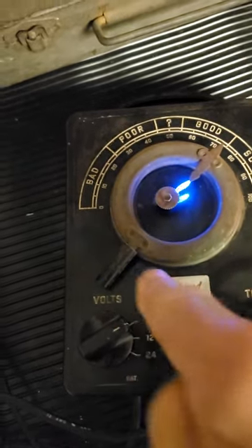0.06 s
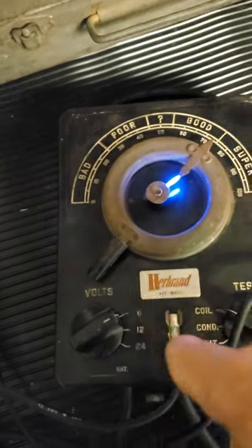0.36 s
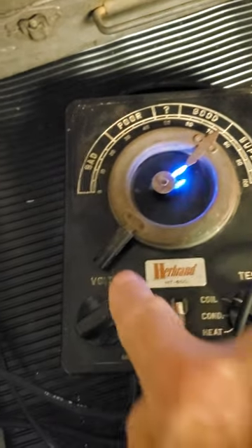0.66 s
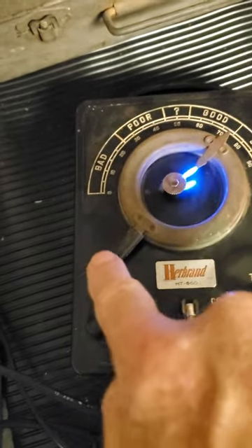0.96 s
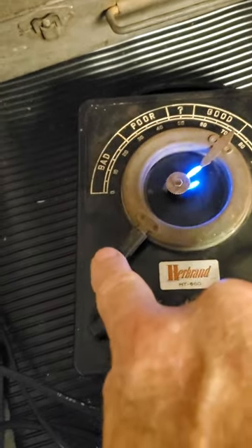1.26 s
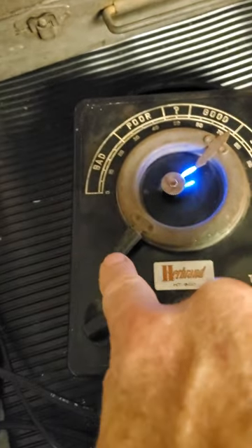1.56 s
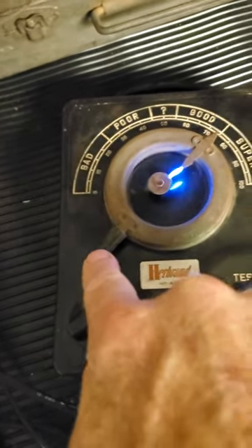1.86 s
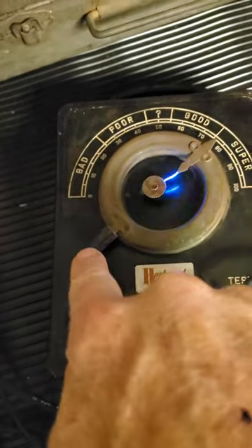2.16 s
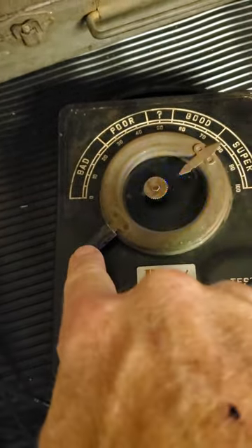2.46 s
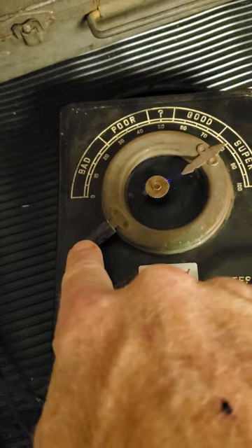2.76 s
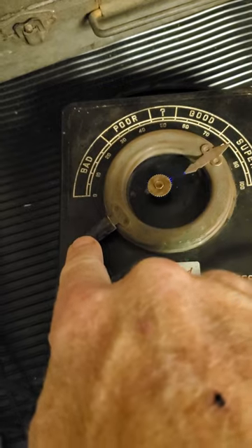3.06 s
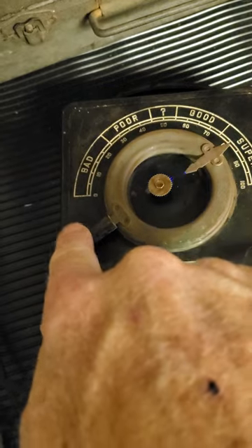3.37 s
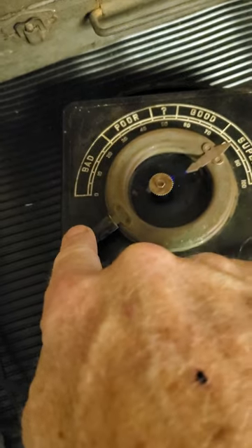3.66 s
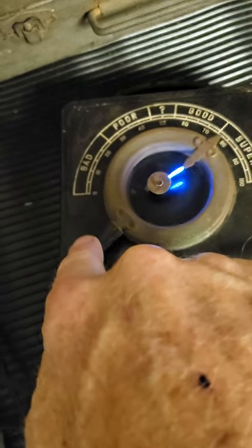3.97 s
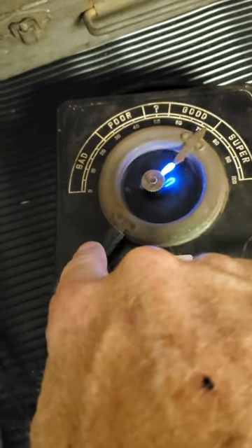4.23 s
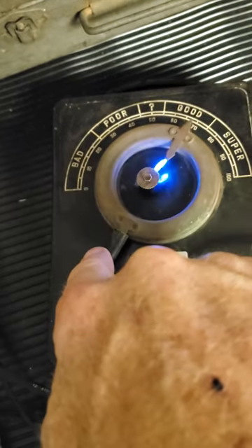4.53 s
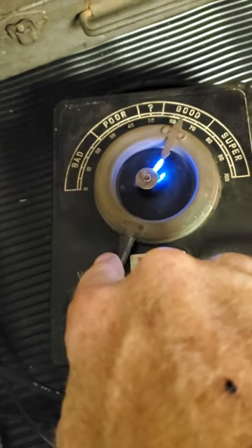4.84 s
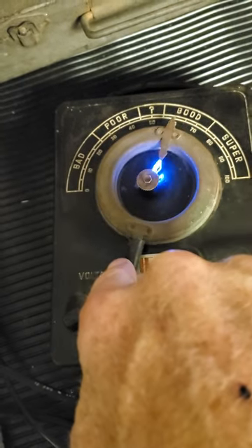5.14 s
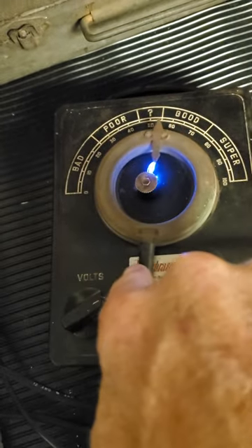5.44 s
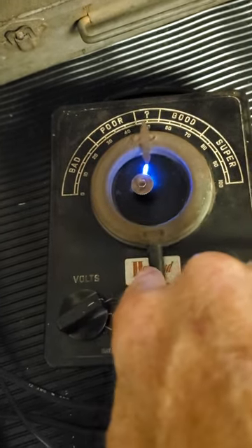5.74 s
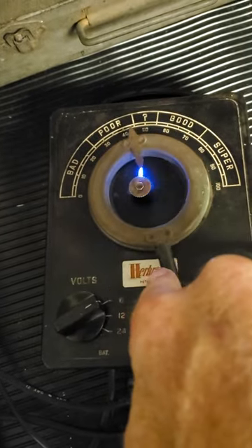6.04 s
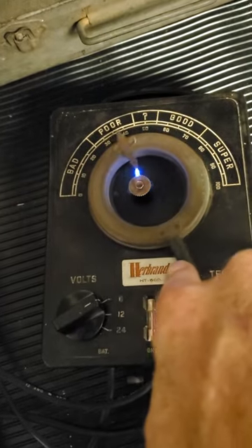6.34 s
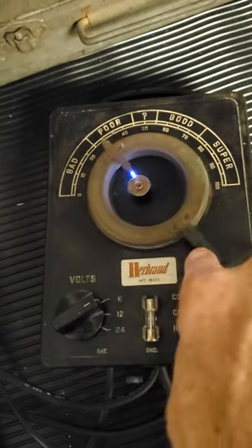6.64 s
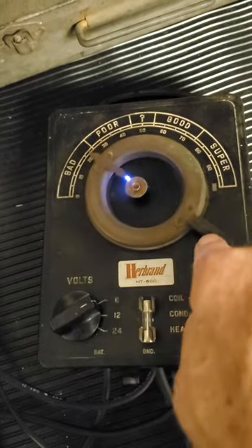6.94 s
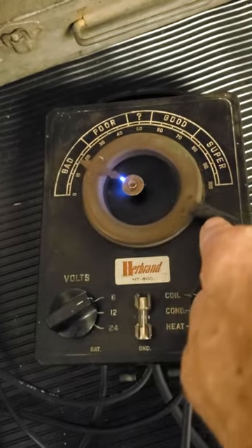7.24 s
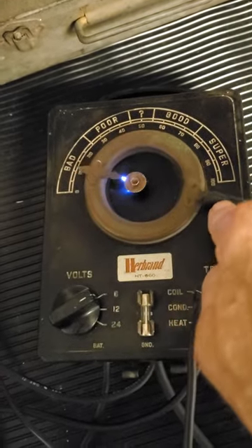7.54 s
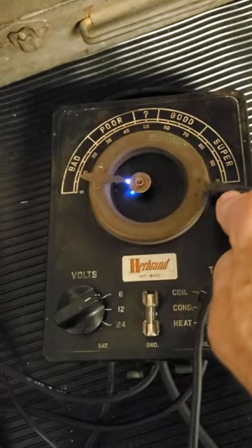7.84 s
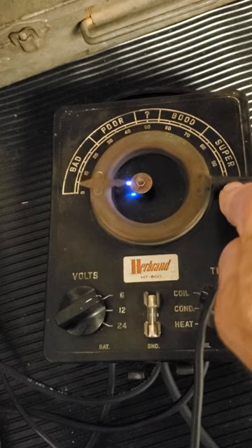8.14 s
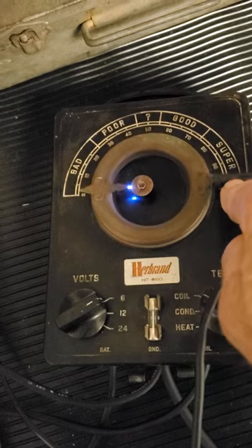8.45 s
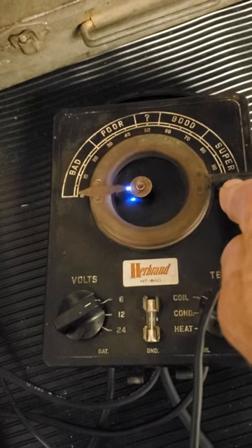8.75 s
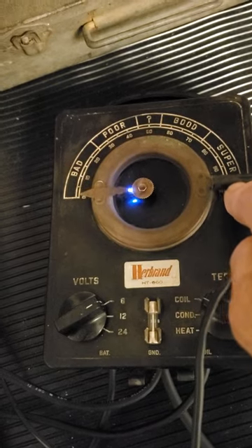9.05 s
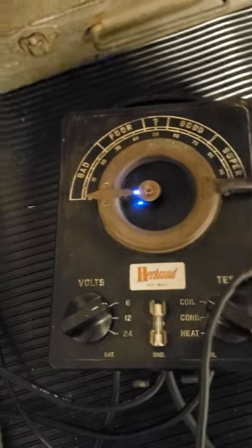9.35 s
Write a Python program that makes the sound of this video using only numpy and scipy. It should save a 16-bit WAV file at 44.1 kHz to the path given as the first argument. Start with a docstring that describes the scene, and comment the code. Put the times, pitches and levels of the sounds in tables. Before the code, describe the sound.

An ignition coil tester buzzes and crackles up close, stuttering into sharp snaps before running evenly and ending in a ragged sizzle.

```python
"""Ignition-coil tester, close up

A buzzer hums and ticks in a small room, firing a spark gap twice in every swing.
A hand widens the gap until the arc stutters into lone snaps over the ticking contacts,
then narrows it: the arc catches again, runs evenly and ends as a softer, ragged sizzle."""
import sys
import numpy as np
from scipy import signal
from scipy.fft import rfft, irfft, next_fast_len
from scipy.io import wavfile
from scipy.ndimage import uniform_filter1d, map_coordinates

SR = 44100
rng = np.random.default_rng(int(sys.argv[2]) if len(sys.argv) > 2 else 0)


def to_wav(s):
    """Save 16-bit WAV."""
    ch = np.atleast_2d(s).T  # columns
    pcm = np.round(np.clip(ch, -1, 1) * 32767)  # PCM
    wavfile.write(sys.argv[1], SR, pcm.astype(np.int16))


N = 423360
TIME = np.arange(N) / SR
TOP_HZ = 15950
WIDE_FROM_S, WIDE_TO_S = 2.267, 4.101  # the gap is too wide for a running arc


def amp(db):
    """Decibels to gain."""
    return 10 ** (np.asarray(db) / 20)


def unit(x):
    """x at an RMS of one."""
    return x / np.sqrt(np.mean(x ** 2) + 1e-20)


def eq_curve(points, hz):
    """Each column after the frequency, read at hz on a log axis."""
    freqs, *columns = np.transpose(points)
    return np.array([np.interp(np.log(hz + 1), np.log(freqs), c) for c in columns])


def automation(rows, t):
    """Each column after the time, read at the times t."""
    knots, *columns = np.transpose(rows)
    return [np.interp(t, knots, c) for c in columns]


def wobble(rate):
    """A smooth random curve, rate knots a second."""
    return map_coordinates(rng.standard_normal(int(N * rate / SR) + 4), [TIME * rate])


def filtered(x, response):
    """x through a frequency response."""
    size = next_fast_len(N + SR // 2)
    return irfft(rfft(x, size) * response(np.fft.rfftfreq(size, 1 / SR)), size)[..., :N]


def pulses(times, sizes, half_width=8):
    """A train of sharp pulses that may fall between samples."""
    at = times[:, None] * SR
    index = np.floor(at).astype(int) + np.arange(1 - half_width, half_width + 1)
    shape = np.sinc(index - at) * np.sinc((index - at) / half_width) * sizes[:, None]
    return np.bincount(np.clip(index, 0, N).ravel(), shape.ravel(), N + 1)[:N]


def fizzing(train, fizz_db, life_s, low_hz):
    """No two discharges take the same path: each pulse carries its own puff of bright noise."""
    decay = np.exp(-1 / (life_s * SR))
    power = signal.lfilter([1 - decay], [1, -decay], train ** 2)
    puffs = np.sqrt(abs(power)) * rng.standard_normal(N)
    return train + amp(fizz_db) * filtered(puffs, lambda hz: hz / np.hypot(hz, low_hz))


def ring(train, colour, low_hz=270, size=2048):
    """Every pulse becomes a minimum-phase stereo click of this colour."""
    hz = np.fft.rfftfreq(size, 1 / SR)
    gain = amp(eq_curve(colour, hz)) * hz ** 2 / (hz ** 2 + low_hz ** 2)
    cepstrum = irfft(np.log(gain + 1e-4))
    cepstrum[:, 1:size // 2] *= 2
    cepstrum[:, size // 2:] = 0
    spectrum = np.exp(rfft(cepstrum))
    energy = np.mean(abs(spectrum * (hz < TOP_HZ)) ** 2)
    click = irfft(spectrum / np.sqrt(energy))
    return signal.oaconvolve(train[None], click, axes=1)[:, :N]


# Pitch of the buzzer: t/s, f/Hz
SWING_RATE = [(0, 112.092), (5.5, 112.088), (7, 112.05), (9.6, 112.04)]


def buzzer():
    """Two strokes a swing, the return a little early: swing count, stroke times and return flags."""
    swings = .06 + np.cumsum(automation(SWING_RATE, TIME)[0]) / SR
    stroke = np.arange(1, int(2 * swings[-1]))
    back = stroke % 2
    return swings, np.interp(stroke / 2 - .005 * back, swings, TIME), back


# Hum fader as the gap widens, is widest and narrows: t/s, relative level/dB
HUM_WIDENING = [(0.02, -37.5), (1.34, -38), (3.03, -34)]
HUM_WIDEST = [(3.42, -32), (3.63, -29.7), (3.74, -29.5), (3.87, -27.5), (4.08, -31.5)]
HUM_NARROWING = [(4.13, -39.5), (5.131, -41.5), (6.65, -41.5), (6.96, -39), (8.05, -36), (8.73, -31.5),
                 (9.56, -32.5)]
HUM_FADER = HUM_WIDENING + HUM_WIDEST + HUM_NARROWING
# Core tone of the hum: harmonic, relative level/dB
HUM_PARTIALS = [(1, 3.5), (3, -29), (5, -54), (6, -36)]
# Buzz on top: harmonic, relative level/dB with the gap open, with a long spark, with a short spark
LOAD_PARTIALS = [(4, -70.5, -56.5, -64.5), (5, -81, -75, -58), (7, -65.5, -72.5, -71), (8, -56, -57.5, -69)]


def coil_hum(swings, waver_db=0.56, octave_db=-26):
    """The coil hums at the swing rate; its upper partials follow the arc's load."""
    snapping = uniform_filter1d(1. * ((TIME > WIDE_FROM_S) & (TIME < WIDE_TO_S)), size=1500)
    tone = sum(amp(db) * np.cos(2 * np.pi * k * swings) for k, db in HUM_PARTIALS)
    # the hum has a faint octave during the stretch of lone snaps
    tone += snapping * amp(octave_db) * np.sin(4 * np.pi * swings)
    hum = unit(tone) * amp(automation(HUM_FADER, TIME)[0])
    narrow = np.sqrt(automation(GAP_STATE, TIME)[1])
    for k, open_db, long_db, short_db in LOAD_PARTIALS:
        loaded = amp(long_db + narrow * (short_db - long_db))
        hum += (snapping * amp(open_db) + (1 - snapping) * loaded) * np.sin(2 * np.pi * k * swings)
    return hum * amp(waver_db * wobble(25)) * amp([[.4], [-.4]])  # leans slightly left


# Dark bed of room noise: f/Hz, relative level/dB
ROOM_TONE_EQ = [(20, -1), (60, 7.5), (130, 10.5), (250, -4.5), (600, -1), (2000, -21), (6000, -46),
                (15000, -123)]


def room_tone(level_db=-62, width=0.62):
    """Faint room noise, partly alike on both sides."""
    noise = rng.standard_normal(N) + width * rng.standard_normal((2, N))
    return amp(level_db) * unit(filtered(noise, lambda hz: amp(eq_curve(ROOM_TONE_EQ, hz))))


# Colour of a contact tick: f/Hz, left level/dB, right level/dB
TICK_EQ = [(220.0, -30, -68), (378, -10, -12), (680, -12.5, -18.5), (860, -9, 0), (1018, -2, -14),
           (1390, -7, -8), (1770, -2.5, -11), (1980, -5.5, -17.5), (2174, 2.5, -3.5), (2790, -6.5, -0.5),
           (3040, -2, -26), (3210, -10.5, -6), (3400, -8, -10), (4150, -1, -9.5), (4520, 2.5, -2.5),
           (5030, -3, -23), (5760, -6, -27), (6200, -15, -12.5), (7500, -23, -33), (10500.0, -19, -20),
           (12700, -10, -6), (14100, -6, -15), (15520, -11, -27)]


def contact_ticks(times, back, gain_db=-20, usual_hum_db=-33, back_db=-5):
    """The contacts tick on every stroke, softer on the return, harder as the coil hums louder."""
    scatter_db, late = rng.standard_normal((2, len(times)))
    drive_db = automation(HUM_FADER, times)[0] - usual_hum_db
    sizes = amp(gain_db + drive_db + scatter_db + back_db * back)
    train = pulses(times + .000014 * late, sizes)
    return ring(fizzing(train, fizz_db=-4.5, life_s=0.001, low_hz=2500), TICK_EQ)


# Temper of the spark gap: t/s, misfire chance (0-1), narrowness (0-1, narrower is more ragged)
GAP_STATE = [(0, .12, 0), (1.3, .13, 0), (2.2, .36, 0), (4.1, .2, 0), (4.5, .02, 0), (6.6, 0, .05),
             (7.5, 0, .7), (9.6, 0, .9)]
# Where the arc strikes again after a brief dropout: t/s
DROPOUT_ENDS = [.72, .979, 1.108, 1.643, 1.987, 2.112]


def spark_train(times, back, dropout_s=.016, corona_db=-27, back_db=2.2, snap_db=3.5, restrike_db=-7):
    """Strokes fire the gap or leave a faint corona tick; a narrow gap fires unevenly and restrikes."""
    misfire, narrow = np.clip(automation(GAP_STATE, times), 0, 1)
    luck, restrike_lag = rng.random((2, len(times)))
    scatter, late, restrike_scatter = rng.standard_normal((3, len(times)))
    pauses = [(WIDE_FROM_S, WIDE_TO_S)] + [(end - dropout_s, end) for end in DROPOUT_ENDS]
    dead = np.any([(times > start) & (times < end) for start, end in pauses], axis=0)
    missed = luck < misfire
    lone_miss = missed & ~np.roll(missed | dead, 1) & ~np.roll(dead, -1)  # chance misfires come singly

    settling = amp(np.interp(times, [4.1, 4.6], [0, -2]))  # the arc steadies once it has caught
    scatter = np.minimum(scatter, 1) * settling  # the coil's charge caps a spark
    sizes = amp(corona_db * (dead | lone_miss) + (0.7 - 1.5 * narrow) * scatter + back_db * back)
    sizes = np.maximum(sizes, amp(snap_db) * lone_snaps(times))

    unrest = amp(4 * np.interp(times, TIME, wobble(4)))  # the timing roughens in patches
    jitter_s = .000015 * unrest + .00011 * narrow
    onsets = times + jitter_s * late - .000175 * narrow * back  # a narrow gap fires early on the return
    restrike_sizes = sizes * narrow * amp(restrike_db + 1.8 * restrike_scatter)
    restrikes = pulses(onsets + .000205 + .00052 * restrike_lag, restrike_sizes)
    return fizzing(pulses(onsets, sizes) + restrikes, fizz_db=-7, life_s=0.0002, low_hz=1200)


# Colours of the long spark, the even one and the short sizzle: f/Hz, left level/dB, right level/dB
LONG_SPARK_EQ = [(222, -51, -64), (368, -14, -13), (676, -25.5, -36.5), (880, -31, -17), (1100, -16, -22),
                 (1370, -15.5, -14.5), (1770, -11, -12.5), (1930, -13, -19), (2225, -8, -11),
                 (2880, -16.5, -11.5), (2880, -6, -20), (3550, -15.5, -15), (3510, -13, -19),
                 (4160, -6, -8.5), (4400, -1.5, -19), (4850, -5, -15.5), (5820, -6, -11.5),
                 (5930, -17.5, -12), (7300, -16.5, -18.5), (8000, -8, -21), (9350, -11, 2.5),
                 (10300, -2, -13), (11230, -4, 8.5), (12030, 7, -3.5), (13200, 7, 6.5), (13900, 3, -13),
                 (14900, 5.5, -3.5)]
EVEN_SPARK_EQ = [(220, -65, -66), (386, -28.5, -21.5), (706, -27, -43), (902, -31, -14), (977, -13, -25.5),
                 (1380, -14.5, -15.5), (1570, -13.5, -16.5),              (1800, -10.5, -11),
                 (1950, -11, -20), (2340, -11.5, -14), (2590, -18, -9.5), (2650, -24, -35),
                 (3330, -12.5, -10), (3750, -12.5, -17.5), (4220, -10, -15), (4370, -6, -11),
                 (4840, -5.5, -22.5), (5880, -6.5, -10.5), (6400, -18, -8.5), (7260, -18, -22.5),
                 (8170, -8.5, -18), (9200, -13, -2.5), (10600, 0, -7.5), (11450, -7, 6), (12900, 7.5, 1),
                 (13400, 3.5, -6.5), (14200, 3.5, 2), (15580, 3.5, -7)]
SIZZLE_EQ = [(223, -46, -71), (378, -18, -18), (676, -28, -24), (895, -27, -63), (1035, -14, -16),
             (1550, -11.5, -15.5), (1920, -13, -17.5), (2170, -11.5, -9), (2700, -9.5, -7.5),
             (3040, -6, -18), (3240, -32, -11.5), (3460, -21, -21.5), (4260, -12.5, -8),
             (4540, -14.5, -15.5), (5000, -14, -29.5), (5700, -6, -6.5), (6260, -10, -14), (7400, -16, -19),
             (9500, -10.5, 4), (10400, -9, -1), (12500, -2, 5), (13600, 0, 6), (14960, 8, 0),
             (15500, 3.5, -11.5)]
# Arc faders as the gap widens, is widest and narrows: t/s, crack level/dB, body level/dB (before trim)
ARC_WIDENING = [(0.1, -24.5, -36), (0.45, -22.5, -34), (2.22, -24.5, -37)]
ARC_WIDEST = [(2.32, -25.5, -38), (4.07, -24.5, -37.5)]
ARC_NARROWING = [(4.15, -25, -37), (6.39, -24, -38), (7.46, -30.5, -43.5), (7.77, -34, -46.5),
                 (8.51, -29, -41), (9.55, -27.5, -39.5)]


def arc(train, split_hz=7000, body_trim_db=1, crack_trim_db=-1.5):
    """Sparks turn from long to even to sizzling with the gap, each a body under a bright crack."""
    narrow = np.clip(automation(GAP_STATE, TIME)[1], 0, 1)
    even = np.interp(TIME, [3.8, 4.6], [0, 1])  # the electrode swings back across the dial
    wide = train * (1 - narrow)
    sparks = ring(wide * (1 - even), LONG_SPARK_EQ) + ring(wide * even, EVEN_SPARK_EQ)
    sparks += ring(train * narrow, SIZZLE_EQ)
    body = filtered(sparks, lambda hz: 1 / (1 + (hz / split_hz) ** 10))
    crack = glancing(sparks - body)
    crack_db, body_db = automation(ARC_WIDENING + ARC_WIDEST + ARC_NARROWING, TIME)
    return amp(body_trim_db + body_db) * unit(body) + amp(crack_trim_db + crack_db) * unit(crack)


# Travel of the electrode on the dial: t/s, angle/degrees right of upright
DIAL_ANGLE = [(0, 42), (1.5, 46), (2.5, 58), (3.5, 65), (4, 55), (4.5, 30), (5.5, 5), (6, -8), (7, -48),
              (8, -88), (9.6, -92)]
# Reflections off hub, rim and hand at the dial's two ends:
# left-end delay/s, right-end delay/s, left-end relative level/dB, right-end relative level/dB
REFLECTIONS = [(.000345, 0.00028, -13, -20), (.00066, .00058, -12, -9), (.00122, 0.00104, -1, -10),
               (.00186, .00168, -17, -6)]


def glancing(crack, dial_ends_deg=(-90, 65), left_db=-9, right_stretch=1.04):
    """The crack also arrives by short detours that change as the dial turns, so its bright peaks sweep."""
    n = np.arange(N)
    turned = np.interp(automation(DIAL_ANGLE, TIME)[0], dial_ends_deg, [0, 1])
    out, power = crack.copy(), np.ones((2, N))
    for left_end_s, right_end_s, left_end_db, right_end_db in REFLECTIONS:
        delay = SR * (left_end_s + turned * (right_end_s - left_end_s))
        gain = amp(left_end_db + turned * (right_end_db - left_end_db)) * amp([[left_db], [0]])
        left = map_coordinates(crack[0], [n - delay])
        right = map_coordinates(crack[1], [n - delay * right_stretch])
        out += gain * [left, right]
        power += gain ** 2
    return out / np.sqrt(power)


def case_and_room(clicks, predelay_s=0.0011, drift=1.17, positions=16):
    """The metal case answers each click and the room rings on, shifting as hand and microphone move."""
    t = np.arange(SR // 3) / SR
    shade = amp([[0], [-2]])  # the right side faces away: less direct sound, more echo

    def tail(t60):
        noise = rng.standard_normal((2, len(t)))
        return unit(noise * amp(-60 * t / t60) * (t > predelay_s)) / np.sqrt(len(t))

    def echoes():
        return (amp(-9) * tail(t60=0.07) + amp(-11) * tail(t60=0.18)) / shade  # case, room

    tilt = [(500, -1.5), (4500, 0.5), (9000, 2.5)]  # small parts scatter treble best
    scattered = filtered(clicks, lambda hz: amp(eq_curve(tilt, hz)))
    resting = echoes()
    place = np.linspace(0, positions - 1, N)
    out = clicks * shade
    for k in range(positions):
        share = np.clip(1 - abs(place - k), 0, 1)  # neighbouring positions cross-fade
        paths = (resting + drift * echoes()) / np.sqrt(1 + drift ** 2)
        start, end = np.flatnonzero(share)[[0, -1]]
        send = scattered[:, start:end] * share[start:end]
        echo = signal.oaconvolve(send, paths, axes=1)[:, :N - start]
        out[:, start:start + echo.shape[1]] += echo
    return out


# Hard snaps: t/s, relative level/dB, number of sparks, ducking of hum and ticks/dB
SNAPS = [(1.108, 1, 1, 0), (1.643, 1, 1, 0), (2.314, -1, 4, 2), (2.355, 0, 1, 1), (2.39, 0, 1, 1),
         (2.417, -1, 5, 1), (2.48, 0, 1, 1), (2.493, -6, 1, 0), (2.497, 0, 1, 1), (2.515, 0, 3, 1),
         (2.533, -2, 1, 1), (2.613, 0, 2, 0), (2.694, 0, 1, 0), (2.783, 1, 1, 1), (3.068, 0, 1, 7),
         (3.345, 2.5, 1, 7), (3.425, -1, 2, 4), (3.461, -1, 1, 4), (3.514, 0, 1, 5), (3.657, 1, 2, 7),
         (3.755, -1, 1, 16), (3.813, 1, 1, 9), (3.88, 4, 1, 6), (3.889, -2, 1, 12), (3.925, 0, 1, 7),
         (3.965, 0, 1, 3), (3.987, 0, 2, 6), (4.014, -1, 1, 7), (4.036, -2, 1, 5), (4.063, 1, 1, 3),
         (4.067, -1, 1, 2), (4.076, 0, 2, 3), (4.103, 2, 1, 3)]


def lone_snaps(times, rise_db=0.1):
    """The fully charged coil jumps the gap, once or in a short burst: spark size on each stroke."""
    sizes = np.zeros(len(times))
    for start, db, count, _ in SNAPS:
        k = np.arange(count)
        step = 2 if count == 2 else 1  # a pair comes a whole swing apart
        sizes[np.argmin(abs(times - start)) + step * k] = amp(db + rise_db * k)
    return sizes


def snap_ducking(recovery_s=.032):
    """Hum and ticks duck briefly at most snaps and swell back: their gain at every sample."""
    gain = np.ones(N)
    for start, _, count, duck_db in SNAPS:
        end = start + (count > 1) / SWING_RATE[0][1]  # held one swing longer at a burst
        low = amp(-duck_db)
        corners = [start - .006, start - .003, end + .002, end + recovery_s]
        gain = np.minimum(gain, np.interp(TIME, corners, [1, low, low, 1]))
    return gain


def scene():
    """Sparks and ticks with their echoes, over the hum and the room tone."""
    swings, times, back = buzzer()
    duck = snap_ducking()
    clicks = arc(spark_train(times, back)) + duck * contact_ticks(times, back)
    lead_s = np.array([[2.5], [-2.5]]) / SR  # the left side is nearer
    clicks = filtered(clicks, lambda hz: np.exp(2j * np.pi * hz * lead_s))
    return case_and_room(clicks) + duck * coil_hum(swings) + room_tone()


def record(dry):
    """A steep high cut at the band limit."""
    return filtered(dry, lambda hz: np.clip((TOP_HZ - hz) / 400 + .5, 0, 1))


dry = scene()
out = record(dry)
to_wav(out)
```